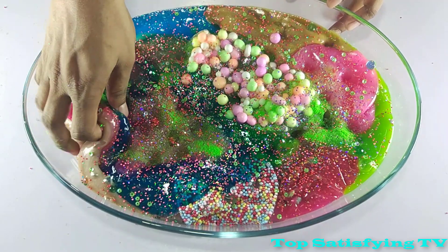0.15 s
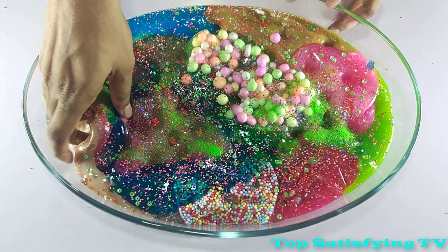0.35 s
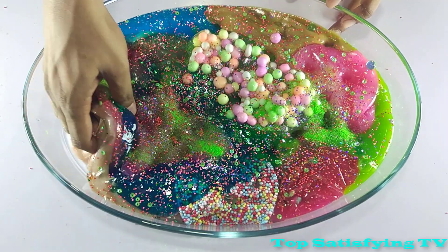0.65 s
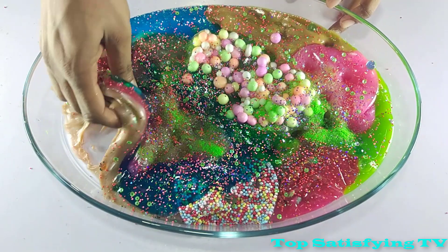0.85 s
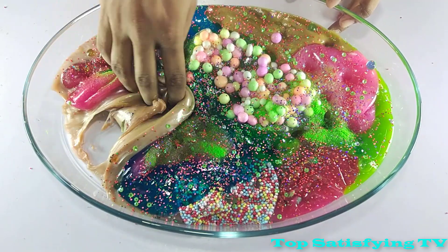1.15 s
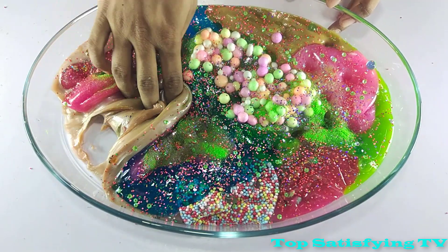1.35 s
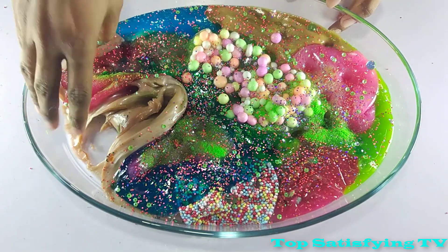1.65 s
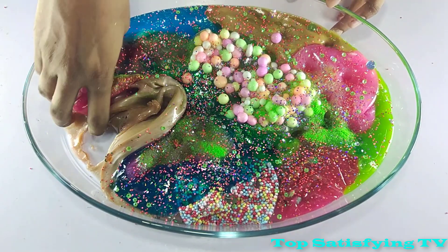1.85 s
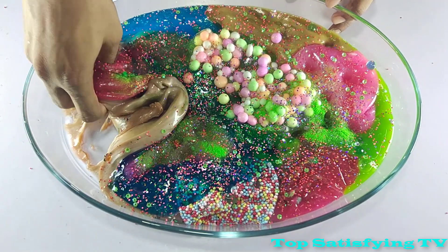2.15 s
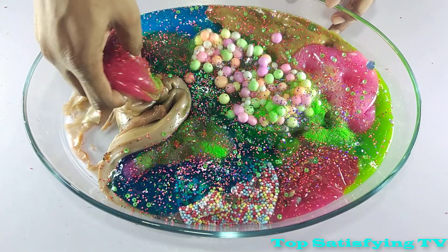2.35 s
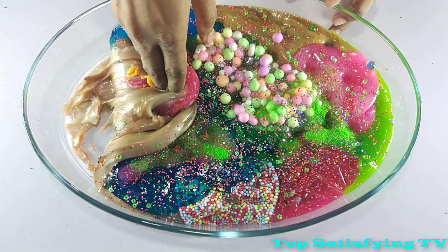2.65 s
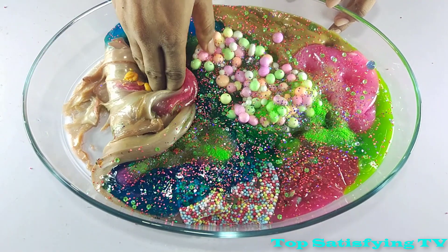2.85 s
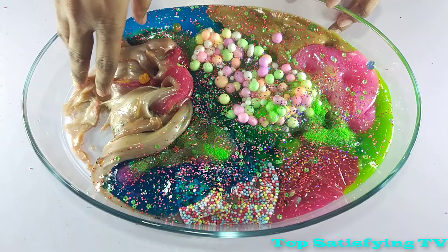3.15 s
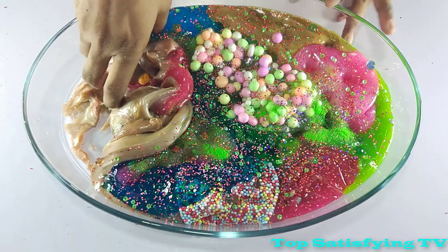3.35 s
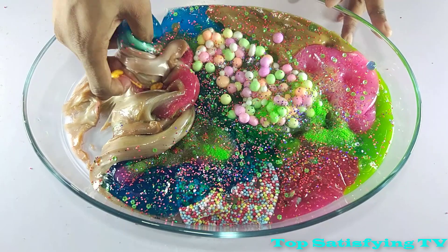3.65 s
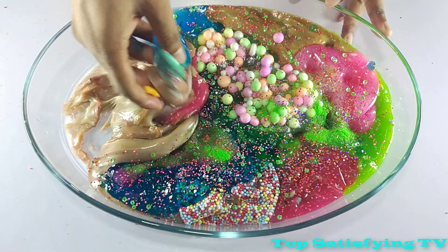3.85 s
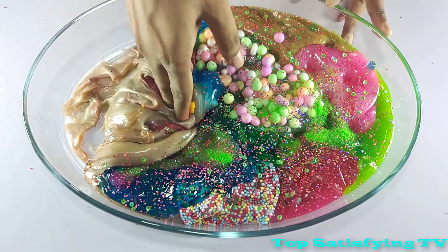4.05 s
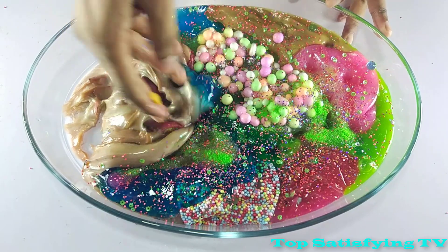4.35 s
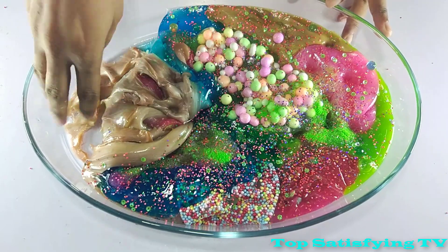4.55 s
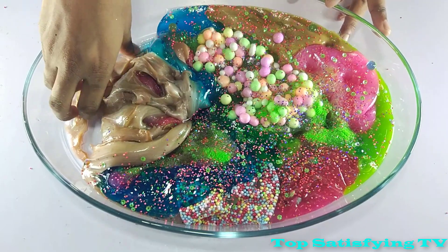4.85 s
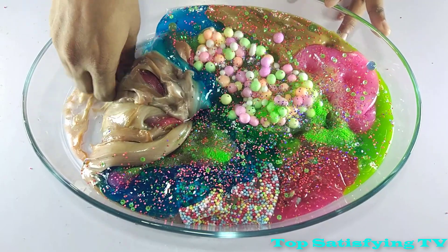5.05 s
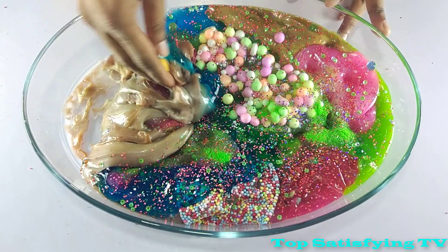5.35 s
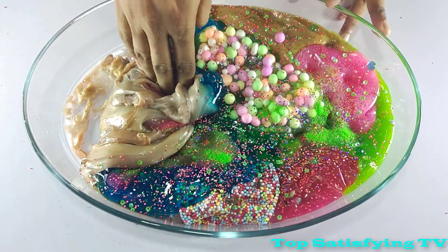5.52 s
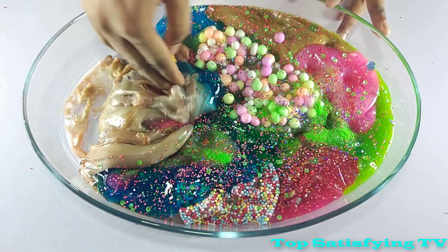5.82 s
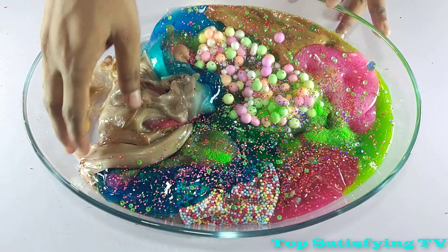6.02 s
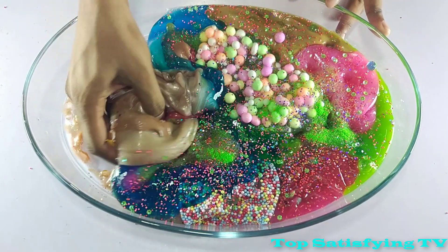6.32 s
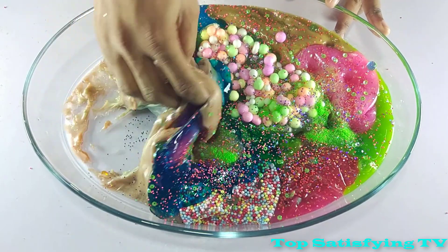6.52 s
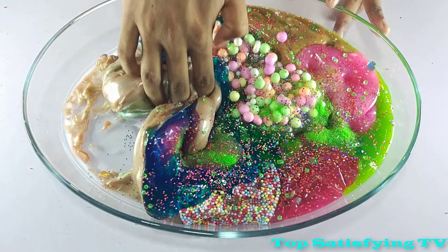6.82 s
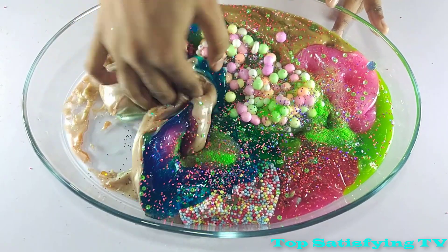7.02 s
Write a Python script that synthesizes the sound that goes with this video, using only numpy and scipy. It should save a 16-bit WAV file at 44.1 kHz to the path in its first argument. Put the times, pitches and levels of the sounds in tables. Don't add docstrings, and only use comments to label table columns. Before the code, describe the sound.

Close wet slime squishing: irregular loud pops and bright clicks, fine sticky crackle, a final deep burst and slap, distant traffic behind.

```python
import sys
import numpy as np
from scipy import signal
from scipy.fft import rfft, irfft, next_fast_len
from scipy.io import wavfile
from scipy.ndimage import uniform_filter1d, minimum_filter1d

SR = 44100
rng = np.random.default_rng(int(sys.argv[2]) if len(sys.argv) > 2 else 0)


def invert_db(x):
    u = np.asarray(x, float) / 20
    return 10 ** u


def unload_wav(signal):
    wavfile.write(
        sys.argv[1],
        SR,
        np.round(np.clip(np.atleast_2d(signal).T, -1, 1) * 32767).astype(np.int16),
    )


N = 316638


def on_log(table, hz):
    f, v = np.transpose(table)
    return np.interp(np.log(np.maximum(hz, 1)), np.log(f), v)


def shaped(x, gain):
    n = next_fast_len(x.shape[-1])
    hz = np.arange(n // 2 + 1) * SR / n
    return irfft(rfft(x, n) * gain(hz), n)[..., :x.shape[-1]]


def level(x, db):
    return x * invert_db(db) / np.sqrt(np.mean(x ** 2))


def walk(rate):
    k = int(SR / rate)
    held = np.repeat(rng.standard_normal(N // k + 1), k)
    slewed = uniform_filter1d(uniform_filter1d(held, k), k)[:N]
    return slewed / slewed.std()


def resonance(hz, width):
    return lambda f: 1 / np.sqrt(1 + ((f ** 2 - hz ** 2) / (np.maximum(f, 1) * width)) ** 2)


def swells(table, rest_db, reach_s=None):
    t = np.arange(N) / SR
    gain = invert_db(rest_db)
    for s, db, *own in table:
        gain = gain + invert_db(db) * np.exp(-((t - s) / (reach_s or own[0])) ** 2)
    return gain


# (frequency [Hz], left minus right [dB])
PORT_COLOUR = [(100, -3.5), (700, -1.5), (1500, .7), (4400, 2), (8000, 4), (15000, 8)]


def ports(x):
    return shaped(x, lambda f: invert_db(np.outer([.5, -.5], on_log(PORT_COLOUR, f))))


# (frequency [Hz], width [Hz], level [dB])
HUM_BODY = [(206, 9.8, -3), (171, 730, -7), (264, 170, -3), (486, 93, -12)]
# (time [s], level [dB])
HUM_THROBS = [(0.1, -76), (0.62, -65), (0.95, -63), (1.2, -69), (1.37, -65), (1.62, -68), (1.81, -61.5),
              (2.03, -65), (2.33, -61), (2.69, -60), (3.08, -69), (3.38, -61), (3.7, -54.5), (4.09, -57),
              (4.48, -62), (4.68, -55.5), (4.95, -48.5), (5.42, -69), (5.84, -71.5), (6.07, -56),
              (6.33, -57.5), (6.58, -59.5), (6.81, -67.5), (7.14, -66)]
# (time [s], level [dB], reach [s])
TRAFFIC = [
    (0.9, -53.5, 0.32),
    (1.75, -53.5, 0.068),
    (3.2, -48.5, 0.3),
    (5.1, -63.5, 0.31),
    (6.15, -53, 0.38),
    (7.2, -34, 0.15),
]
# (frequency [Hz], level per Hz [dB])
AIR_COLOUR = [(60, -41), (217, 0), (408, -9), (1860, -16), (4000, -19), (5000, -16.5), (6900, -22),
              (15500, -24)]


def town():
    hum_hz = 202.4 * (1 + .015 * walk(9))
    port_phase = np.array([[.5], [-.4]])
    drone = np.sin(2 * np.pi * np.cumsum(hum_hz) / SR + port_phase)
    body = 0
    for hz, width, db in HUM_BODY:
        noise = rng.standard_normal(N) + 1.1 * rng.standard_normal((2, N))
        body = body + invert_db(db) * level(shaped(noise, lambda f: resonance(hz, width)(f) ** 2), 0)
    hum = level(drone + body, -1.15) * swells(HUM_THROBS, rest_db=-67.5, reach_s=0.058)

    rumble = rng.standard_normal(N) + 11.0 * rng.standard_normal((2, N))
    traffic = level(shaped(rumble, lambda f: resonance(620, 450)(f) ** 2), -11.0)
    traffic = traffic * swells(TRAFFIC, rest_db=-82) * invert_db(0.54 * walk(5))

    air = shaped(rng.standard_normal((2, N)), lambda f: invert_db(on_log(AIR_COLOUR, f)))
    return ports(hum + traffic + level(air, -60.5) * invert_db(1.5 * walk(6)))


# (time of strongest pull [s], strand crackle level [dB], reach [s], wet squelch level [dB])
PULLS = [(0.0, -49.5, 0.097, -61), (0.34, -59, 0.049, -54.5), (0.708, -58, 0.074, -65),
         (1.12, -62, .03, -85), (1.46, -47, 0.028, -48), (1.998, -56, 0.042, -53),
         (2.551, -46.5, 0.051, -60), (2.951, -52.5, 0.037, -52.5), (3.449, -46, 0.071, -62.5),
         (3.9, -51, 0.034, -67), (4.321, -47, 0.025, -51), (4.88, -52.5, 0.08, -69),
         (4.99, -44.5, 0.1, -60.5), (5.121, -52, 0.049, -56), (5.33, -50, 0.032, -58),
         (5.8, -51, 0.028, -48.5), (6.15, -76, 0.076, -59), (6.33, -49.5, 0.064, -56),
         (6.449, -54.5, 0.12, -70), (6.617, -75.5, 0.049, -63.5), (6.799, -63.5, 0.049, -71),
         (7.05, -51.5, 0.037, -50)]


def snapping_strands():
    chance, size, sign = rng.random((3, N))
    loudness = invert_db(np.minimum(-3.5 * np.log(size + 1e-9), 14))
    return (chance < 1500 / SR) * loudness * np.sign(sign - .5)


def peel():
    sharp = level(shaped(snapping_strands(), lambda f: resonance(10500, 9000)(f) ** 2), 0)
    sharp = sharp * swells(PULLS, rest_db=-71)
    sucks = [(s, db, reach_s) for s, _, reach_s, db in PULLS]
    dull = level(shaped(snapping_strands(), lambda f: resonance(1500, 3000)(f) ** 2), 0)
    dull = dull * swells(sucks, rest_db=-79)
    return np.outer(invert_db(np.array([3.0, -3.0])), invert_db(-4.0) * sharp) + invert_db(-3.0) * dull


# (time [s], extra lag [samples])
HAND_PATH = [
    (0, 3),
    (1.5, 1),
    (2.2, 4),
    (3.8, 4),
    (4.34, 2),
    (4.9, 4),
    (5.3, 4),
    (5.8, 0),
    (7.2, 0),
]


def pops(table, tear_s, rough, glide, crack_db, gain_db, cut_hz, give_s=0.0009):
    lead, span = 1792, 2048
    out = np.zeros((2, N + 3 * span))
    t = np.arange(span // 2) / SR
    ragged = rng.standard_normal((len(table), 2, span))
    age = (np.arange(span) - lead) / SR
    creak = invert_db(-14) * np.exp(-np.abs(age) / 0.001) + invert_db(-46) * np.exp(-np.abs(age) / 0.013)
    effort = np.where(age < 0, creak, np.exp(-np.abs(age) / tear_s))
    places = 1.2 * ragged[:, 0, 0]
    for (s, db, hz, cycles), noise, place_db in zip(table, ragged, places):
        fade = np.exp(-t * hz / max(cycles, .3))
        ring = fade * np.sin(2 * np.pi * hz * t * (1 - glide * fade))
        apart = 0.6 * min(hz / 2500, 1) * np.outer([1, -1], noise[1])
        push = rough * effort * (noise[0] + apart) + (age == 0)
        pop = signal.fftconvolve(push, ring[None], axes=1)
        pop = pop / np.abs(pop).max()
        pop[:, 1:span] += invert_db(crack_db) * (push[:, 1:] - 2.2 * push[:, :-1])
        pop[0] = np.roll(pop[0], round(np.interp(s, *np.transpose(HAND_PATH))))
        tilt_db = (on_log(PORT_COLOUR, hz) + place_db) * np.array([[.5], [-.5]])
        i = int((s + give_s) * SR)
        out[:, i:i + pop.shape[1]] += pop * invert_db(db + gain_db + tilt_db)
    high = signal.butter(4, cut_hz, "high", fs=SR, output="sos")
    return signal.sosfilt(high, out[:, lead:lead + N])


# (time [s], peak level [dB], pitch [Hz], ring [cycles])
HOLLOWS = [(0.008, -38, 1360, 1.3), (0.36, -25.5, 1510, 4), (0.36, -25, 2080, 5), (0.36, -40, 980, 6.5),
           (0.492, -46.5, 1850, 5), (0.668, -38.5, 1650, 0.82), (1.483, -16.5, 1806, 3),
           (1.483, -26.5, 1130, 1.2), (1.71, -48.5, 920, 8.4), (2.014, -40.5, 1270, 1.3),
           (2.226, -47, 1950, 3.4), (2.839, -43.5, 2560, 2.7), (2.981, -10, 940, 2.4),
           (2.982, -14.5, 1370, 1.5), (4.336, -26, 2460, 2.7), (4.344, -22.5, 1470, 2.5),
           (4.343, -31, 1960, 3), (4.344, -28.5, 937, 3.7), (4.618, -50, 932, 6.3),
           (4.955, -22.5, 1100, 0.28), (5.075, -40, 1460, 5.5), (5.148, -25, 1470, 1.7),
           (5.826, -12, 1138, 3.2), (5.83, -13.5, 1800, 1.5), (5.8315, -17, 1000, 2.5),
           (5.838, -7.5, 1370, 2), (5.8435, -16.5, 1140, 2.2), (6.432, -37.5, 2030, 3),
           (6.599, -39, 1770, 3.6), (6.898, -31.5, 2600, 1.6), (7.049, -48, 1850, 1.7),
           (7.07, -17, 895, 1.85), (7.093, -21, 2060, 2), (7.093, -10.5, 930, 0.98),
           (7.1005, -13, 940, 1.2)]


def gulps():
    return pops(HOLLOWS, tear_s=0.0009, rough=0.23, glide=0.0091, crack_db=-41.0, gain_db=0.0, cut_hz=520)


# (time [s], peak level [dB], pitch [Hz], ring [cycles])
BEADS = [(0.0084, -26.5, 4950, 0.67), (0.3591, -22.5, 3150, 0.23), (1.4651, -30, 4580, 0.57),
         (1.4825, -40, 6280, 0.61), (1.492, -25, 3440, 0.36), (1.7185, -37.5, 4700, 1.1),
         (2.0123, -26.5, 3140, 1.2), (2.2283, -18, 4890, 1.37), (2.5411, -40, 6200, 0.27),
         (2.8399, -29, 6430, 0.48), (2.9821, -3, 6360, 3.76), (2.9821, -14, 7200, 2.4),
         (3.494, -29, 5500, 2.9), (3.7559, -26.5, 6840, 2.4), (4.343, -0.5, 6420, 1.1),
         (4.343, -11.5, 2940, 0.58), (4.6169, -34, 5620, 0.34), (4.8818, -41, 7000, 1.9),
         (4.9556, -32.5, 4800, 1.7), (5.033, -35, 7160, 0.43), (5.0764, -30, 5750, 2.2),
         (5.1322, -23, 4450, 1.2), (5.1497, -0.5, 5070, 1.5), (5.3204, -34.5, 6430, 0.67),
         (5.827, -18.5, 3300, 1.4), (5.8365, -7, 4880, 0.87), (5.836, -20.5, 2970, 1.7),
         (5.8435, -17, 2800, 2.2), (6.317, -31, 6770, 3.7), (6.4028, -27, 5520, 2.4),
         (7.0509, -42, 2620, 1.6), (7.0654, -15.5, 5500, 0.58), (7.0703, -10.5, 4400, 0.9),
         (7.0931, -3, 2730, 0.55)]


def snaps():
    return pops(BEADS, tear_s=0.0003, rough=0.2, glide=0.019, crack_db=-33.5, gain_db=9.0, cut_hz=1360)


def burst_films(table):
    return pops(table, tear_s=0.00017, rough=0.42, glide=0.043, crack_db=-11.5, gain_db=11.0, cut_hz=4160)


# (time [s], peak level [dB], pitch [Hz], ring [cycles])
RIPPED_FILMS = [(0.0084, -20.5, 10700, 1.34), (0.3591, -37, 5400, 1.25), (1.4824, -16, 7670, 3),
                (1.4925, -13.5, 8730, 1.1), (2.0043, -23.5, 9650, 1.35), (2.0178, -26, 14600, 13),
                (2.2283, -24, 10500, 1.45), (2.5426, -26, 10480, 6.1), (2.8389, -32.5, 10900, 2.5),
                (2.9813, -7, 8740, 2.07), (3.4411, -18.5, 12700, 1.6), (3.4935, -14, 11400, 0.35),
                (3.7554, -19, 7560, 2.2), (4.3425, -4, 7400, 2.9), (4.8823, -23.5, 10900, 1.3),
                (4.9546, -16.5, 14400, 1.2), (5.033, -30, 12100, 2.7), (5.1494, 2, 9150, 0.6),
                (5.8244, -24, 10400, 3), (5.8321, -17.5, 11500, 0.95), (5.8424, -5, 9900, 0.87),
                (6.317, -22.5, 13400, 2.7), (6.3285, -21, 12600, 1.6), (6.4378, -17, 10070, 5.16),
                (6.6009, -33.5, 11190, 5.7), (7.0658, -17, 8670, 1.9), (7.0703, -12.5, 9100, 1.8),
                (7.0943, 0, 10000, 0.48)]


def rips():
    return burst_films(RIPPED_FILMS)


# (delay [s], left level [dB], right level [dB])
FIRST_ECHOES = [
    (.00045, -14.5, -14),
    (.00105, -6, -9.5),
    (.0023, -7, -11),
    (.0040, -12.5, -10.5),
    (.0060, -19.5, -16),
    (.0150, -13, -15.5),
]


def near():
    response = np.zeros((2, 2048))
    response[:, 0] = 1
    smear = rng.standard_normal((len(FIRST_ECHOES), 3, 256))
    for (s, *db), rough in zip(FIRST_ECHOES, smear):
        spread = (rough[0] + .5 * rough[1:]) * np.exp(-np.arange(256) / (.3 * s * SR))
        spread[:, 0] += 400 / (s * SR)
        spread = spread / np.linalg.norm(spread, axis=1, keepdims=True)
        i = int(s * SR)
        response[:, i:i + 256] += invert_db(np.array(db))[:, None] * spread
    response[0] = np.roll(response[0], 4)
    return response


# (frequency [Hz], time to fall 60 dB [s])
ROOM_DECAY = [(300, 0.21), (800, 0.19), (2100, 0.21), (5500, 0.27), (14600, 0.23)]


def room():
    start_s, fill_s = 0.0017, 0.0068
    t = np.arange(SR // 3) / SR
    tail = 0
    for hz in 200 * 2 ** np.arange(0, 6.6, .5):
        noise = rng.standard_normal((2, len(t)))
        mid, side = shaped(noise, lambda f: np.exp(-(np.log2(np.maximum(f, 1) / hz) / 0.53) ** 2))
        both = mid + min(hz / 1800, 1) * np.outer([1, -1], side)
        tail = tail + both * invert_db(-60 * t / on_log(ROOM_DECAY, hz))
    tail = tail * (1 - np.exp(-np.maximum(t - start_s, 0) / fill_s))
    return ports(tail * invert_db(-4) / np.sqrt(np.sum(tail ** 2) / 2))


# (time [s], peak level [dB], pitch [Hz])
SURFACE_FILMS = [(0.117, -40, 12900), (0.7168, -41, 9500), (1.11, -42.5, 10500), (1.264, -48.5, 9000),
                 (1.463, -25.5, 8760), (1.7185, -40, 10200), (1.976, -45.5, 15800), (2.5083, -41, 8830),
                 (2.638, -40.5, 11300), (2.761, -40.5, 10500), (2.8105, -37.5, 10300),
                 (3.394, -44.5, 12500), (3.4145, -37, 13000), (3.43, -38, 12500), (3.455, -32, 13300),
                 (3.551, -38, 9900), (3.736, -34.5, 10800), (3.8573, -39, 11800), (3.913, -38.5, 10770),
                 (4.0597, -36.5, 11020), (4.6152, -35.5, 10850), (4.68, -40, 14500), (4.8113, -40.5, 9500),
                 (4.831, -39.5, 11600), (5.0385, -34, 10900), (5.0762, -37, 10600), (5.132, -31, 8860),
                 (5.3215, -31, 10700), (6.773, -47.5, 10330), (6.897, -42, 9160)]


def ticks():
    table = [(*tick, 7.4) for tick in SURFACE_FILMS]
    return pops(table, tear_s=0.0016, rough=0.66, glide=0.012, crack_db=-11.0, gain_db=6.5, cut_hz=3300)


# (time [s], peak level [dB], pitch [Hz], ring [cycles])
SLAPS = [(2.013, -28, 421, 4), (3.749, -52, 180, 2.5), (4.958, -21.5, 201, 3.3), (5.148, -51, 456, 2.2),
         (7.101, -9, 518, 5.3), (4.956, -21, 300, 2), (5.149, -27, 269, .6), (5.832, -25, 638, 2.7),
         (0.36, -38, 440, 2.5), (1.483, -33, 506, 2.9), (4.344, -51, 503, 1.9), (4.96, -25.5, 495, 3.2),
         (5.83, -26, 523, 3.4)]


def thuds():
    return pops(SLAPS, tear_s=0.0024, rough=0.3, glide=0.022, crack_db=-56.5, gain_db=-15.0, cut_hz=63)


# (time [s], peak level [dB], pitch [Hz], ring
DROPLETS = [
    (1.493, -8.5, 10950, 2.8),
    (2.077, -59, 15500, 2.2),
    (2.983, -8.5, 11040, 1.3),
    (3.7568, -11, 10960, 0.35),
    (3.863, -33, 15100, 3),
    (4.3385, -25.5, 12570, 0.9),
    (5.8344, -14.5, 12200, 0.85),
    (6.4376, -19.5, 12780, 2.3),
    (7.065, -23.5, 13900, 2.1),
]


def spray():
    return burst_films(DROPLETS)


# (time [s], pitch [Hz], level [dB])
MOTOR = [
    (3.08, 760, -88),
    (3.14, 745, -61),
    (3.27, 690, -68.5),
    (3.39, 660, -61.5),
    (3.45, 655, -88),
]


def whine():
    s, hz, db = np.transpose(MOTOR)
    t = np.arange(N) / SR
    pitch_hz = np.interp(t, s, hz) * (1 + .012 * walk(40))
    turn = 2 * np.pi * np.cumsum(pitch_hz) / SR
    return invert_db(np.interp(t, s, db, -140, -140) + 3 * walk(30)) * np.sin(turn)


# (multiple of 350 Hz, level [dB])
HORN_PARTIALS = [(1, -25), (2, 1), (3, -3), (4, -5), (5, -3), (6, -1), (7, -6)]


def horn():
    on_s, off_s, edge_s = 6.03, 6.36, .14
    turn = 2 * np.pi * np.cumsum(350 * (1 + .006 * walk(60))) / SR
    tone = 0
    for k, db in HORN_PARTIALS:
        phase = rng.random((2, 1)) * 2 * np.pi
        tone = tone + invert_db(db + 4 * walk(40)) * np.sin(k * turn + phase)
    t = np.arange(N) / SR
    gate = np.clip(np.minimum(t - on_s, off_s - t) / edge_s + .5, 0, 1)
    return level(tone, -61) * gate


# (films [dB], pockets [dB], hollows [dB])
WALL_DB = (1.5, 3.5, 2)


def scene():
    films = rips() + spray() + ticks()
    pockets = snaps() + peel()
    hollows = gulps() + thuds()
    close = signal.fftconvolve(films + pockets + hollows, near(), axes=1)[:, :N]
    walls = 0
    for x, db in zip((films, pockets, hollows), WALL_DB):
        source = x.mean(axis=0, keepdims=True)
        walls = walls + signal.fftconvolve(source, room(), axes=1)[:, :N] * invert_db(db)
    return close + walls + town() + whine() + horn()


def limit(x, top, hold_s):
    k = int(hold_s * SR)
    dip = np.minimum(top / (np.abs(x).max(axis=0) + 1e-9), 1)
    dip = minimum_filter1d(dip, 2 * k + 1)
    return x * uniform_filter1d(dip, k)


def starve(x, below_db, scatter_db, thin_db):
    hz, _, spec = signal.stft(x, SR, nperseg=1024)
    band = np.arange(len(hz)) // 8
    power = np.add.reduceat(np.abs(spec) ** 2, np.arange(0, len(hz), 8), axis=1) / 8 + 1e-20
    both = power.sum(axis=0)
    around = uniform_filter1d(both, size=9, axis=0)
    luck = uniform_filter1d(rng.standard_normal(both.shape), size=5, axis=1)
    weak_band = 10 * np.log10(both / around) + scatter_db * luck < -below_db
    weak_line = np.abs(spec) < invert_db(thin_db) * np.sqrt(power[:, band])
    frame = both[6:45].sum(axis=0)
    steady = minimum_filter1d(1 * (frame < 4 * np.roll(frame, 2)), size=3) > 0
    empty = (weak_band[band] | (weak_line & steady)) & (hz[:, None] > 2600)
    return signal.istft(np.where(empty, invert_db(-26), 1) * spec, SR, nperseg=1024)[1][:, :N]


def band_limit(x):
    return signal.sosfilt(signal.butter(12, 16370, fs=SR, output="sos"), x)


def record(dry):
    limited = limit(dry, top=1.15, hold_s=.0005)
    thin = signal.sosfilt(signal.butter(2, 130, "high", fs=SR, output="sos"), limited)
    dull = signal.sosfilt(signal.ellip(10, .3, 60, 15900, fs=SR, output="sos"), thin)
    mix = starve(dull, below_db=5.5, scatter_db=7.5, thin_db=-2.5)
    return band_limit(mix)


dry = scene()
out = record(dry)
unload_wav(out)
```